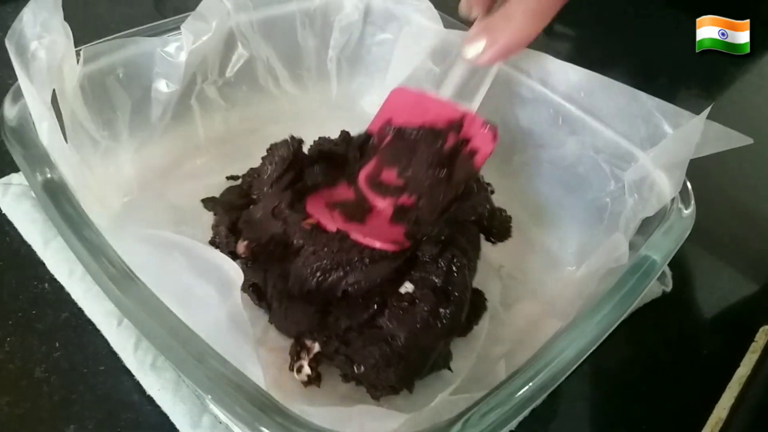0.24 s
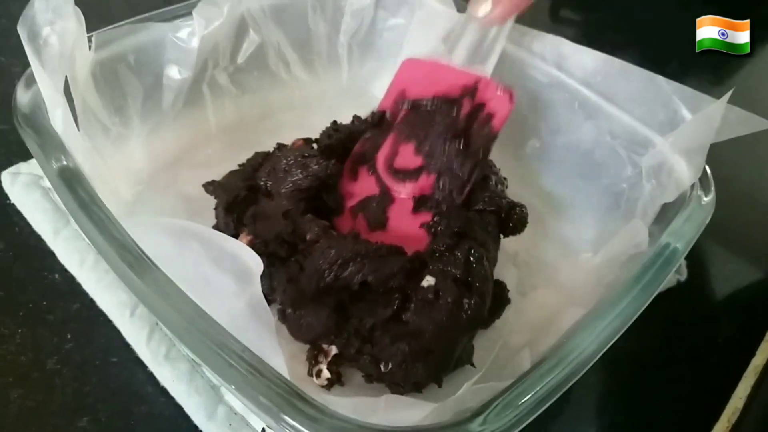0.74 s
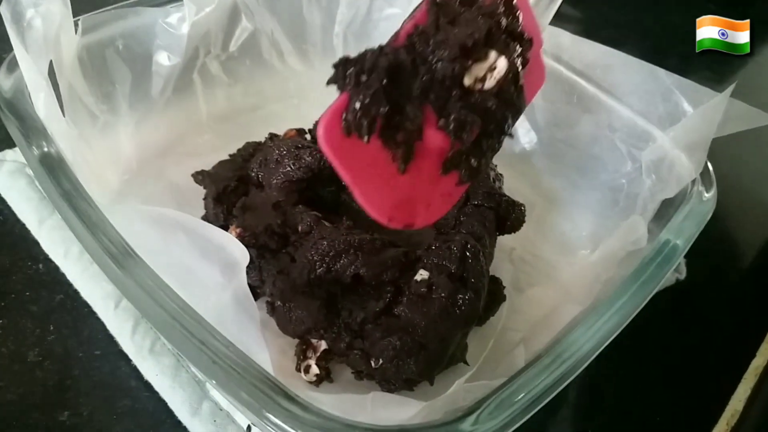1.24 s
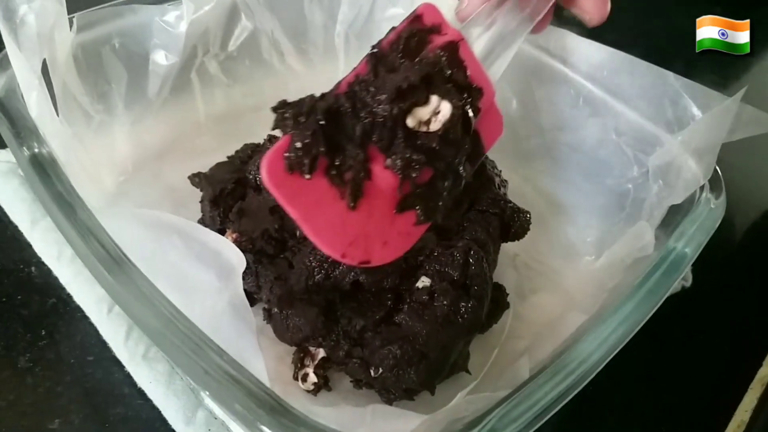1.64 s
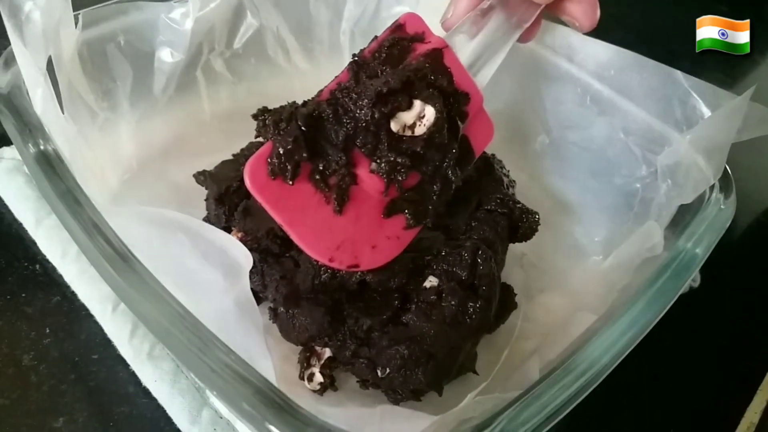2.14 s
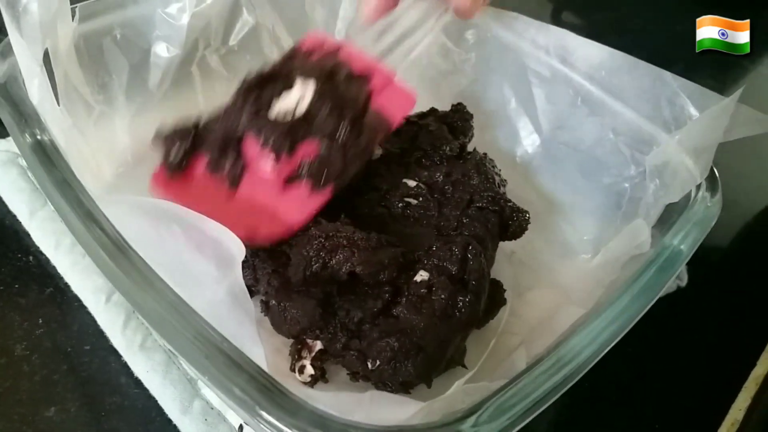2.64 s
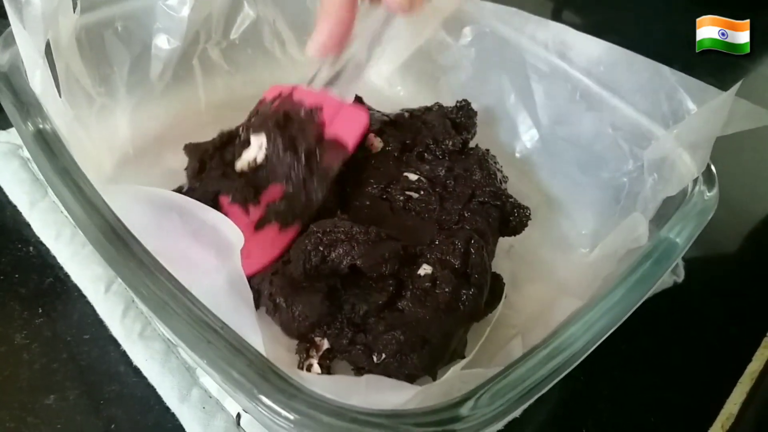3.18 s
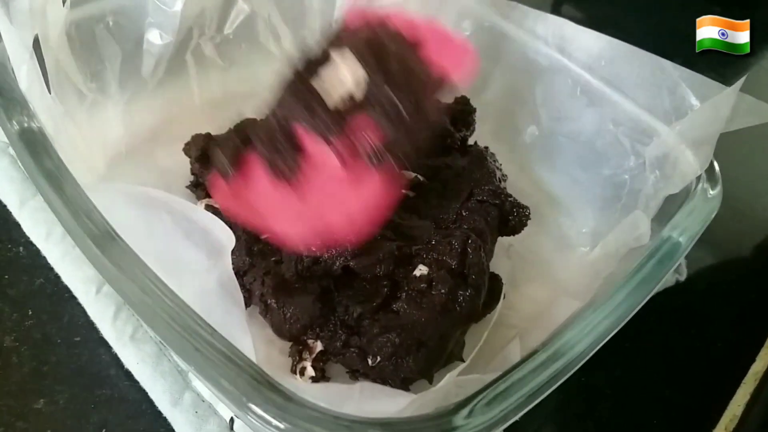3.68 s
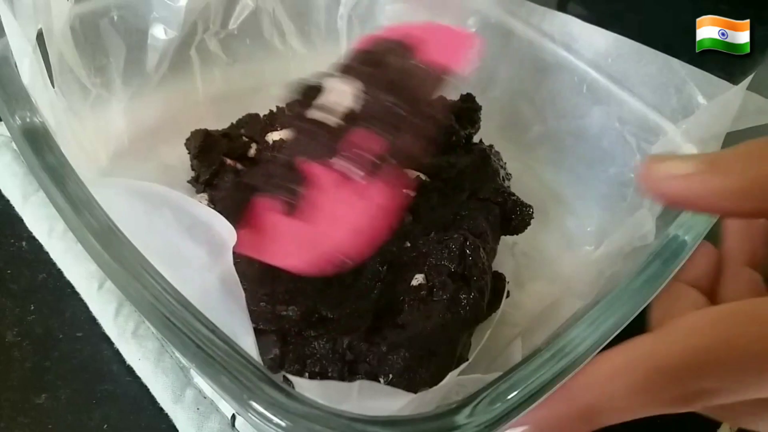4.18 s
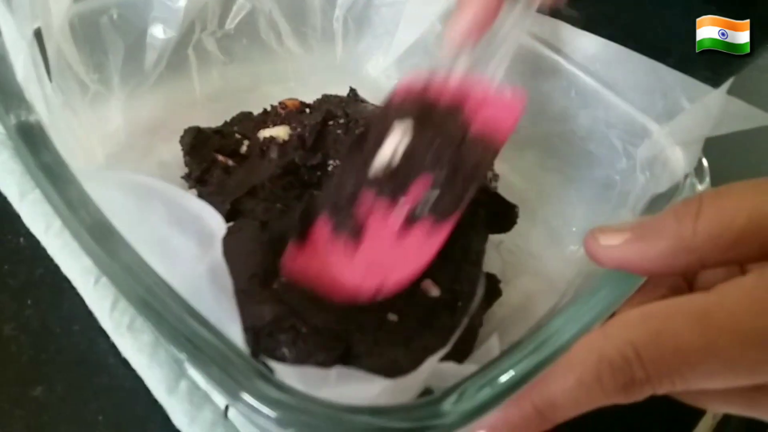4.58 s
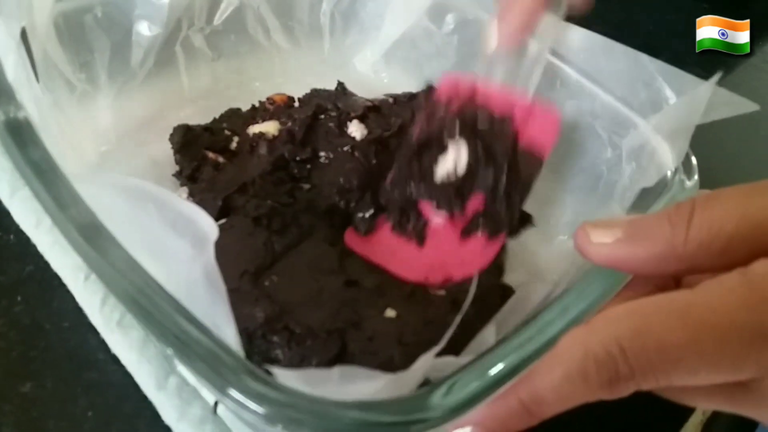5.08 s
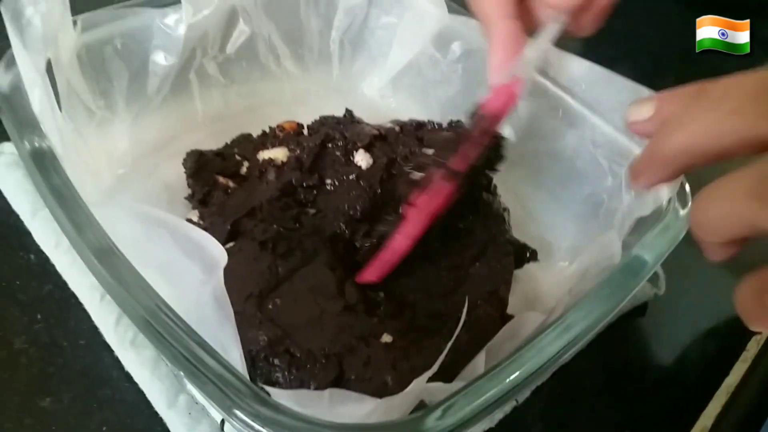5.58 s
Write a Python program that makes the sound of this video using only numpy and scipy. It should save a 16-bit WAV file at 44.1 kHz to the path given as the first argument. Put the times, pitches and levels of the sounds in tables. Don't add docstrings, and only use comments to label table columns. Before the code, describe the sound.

Close to a small camera microphone, a spatula presses thick sticky fudge onto paper in a glass dish: soft squelches, small pops, crisp crackles. Dry camera ticks run early on. A knock further off in a hard-walled kitchen sets panels and steel ringing, then a soft door thud follows. The final part brings the loudest wet smacks over a faint hum.

```python
import sys
import numpy as np
from scipy import signal
from scipy.fft import rfft, irfft
from scipy.io import wavfile
from scipy.ndimage import uniform_filter1d

SR = 44100
rng = np.random.default_rng(int(sys.argv[2]) if len(sys.argv) > 2 else 0)


def store_pcm(level_fs):
    pcm = np.round(np.clip(level_fs, -1, 1) * 32767).astype(np.int16)
    wavfile.write(sys.argv[1], SR, np.atleast_2d(pcm).T)


def volts_from_db(level):
    exponent = np.asarray(level, float) / 20
    return 10 ** exponent


N = 256662
TIME = np.arange(N) / SR


def unit(x):
    return x / np.sqrt(np.mean(x ** 2))


def band(x, lo_hz, hi_hz):
    return signal.sosfilt(signal.butter(2, [lo_hz, hi_hz], "band", fs=SR, output="sos"), x)


def on_log_hz(table, hz):
    f, v = np.transpose(table)
    return np.interp(np.log(np.maximum(hz, 1)), np.log(f), v)


def colour(x, table):
    spectrum = volts_from_db(on_log_hz(table, np.fft.rfftfreq(4096, 1 / SR)))
    cepstrum = irfft(np.log(spectrum))
    cepstrum[1:2048] *= 2
    cepstrum[2049:] = 0
    h = irfft(np.exp(rfft(cepstrum)))[:2048]
    return signal.fftconvolve(x, h / np.linalg.norm(h))[:len(x)]


def fade(t, t60):
    return np.exp(-np.log(1000) * t / t60)


def onset(t, rise_s):
    return np.minimum(t / rise_s, 1)


def add(track, s, sound):
    i = int(s * SR)
    track[i:i + len(sound)] += sound[:N - i]


def walk(rate):
    k = int(SR / rate)
    return uniform_filter1d(np.repeat(rng.standard_normal(N // k + 1), k), k)[:N]


def swells(rows, rest_db):
    power = volts_from_db(rest_db) ** 2
    for s, db, rise, fall in rows:
        before = (s - TIME) / max(rise, .005)
        after = (TIME - s) / max(fall, .005)
        power = power + volts_from_db(db - 20 * np.maximum(before, after)) ** 2
    return np.sqrt(power)


def blip(t, hz, cycles):
    u = t * hz / cycles
    return (u * np.exp(1 - u)) ** 2 * np.sin(2 * np.pi * hz * t)


def burst(t, hz, cycles, rise=0.24):
    u = t * hz
    shape = (1 - np.exp(-u / rise)) ** 2 * np.exp(-u / (1.8 * cycles))
    return shape / shape.max() * np.sin(2 * np.pi * u)


def crackle(rate, lo_hz, hi_hz, cycles, spread_db):
    out, t = np.zeros(N), TIME[:256]
    for when, pitch, size in rng.random((int(rate * N / SR), 3)):
        hz = lo_hz * (hi_hz / lo_hz) ** pitch
        level = volts_from_db(-spread_db * np.log(size + 0.043))
        add(out, when * N / SR, level * blip(t, hz, cycles))
    return unit(out)


# start in seconds, peak level in dB, cavity pitch in Hz, ring in cycles.
CLEAN_POPS = [(.432, -50, 3400, 1.1), (.435, -50, 3460, 1.4), (.4468, -41, 3550, 5.2),
              (.447, -35, 1080, 0.6), (.447, -46, 2440, 3.9), (.4498, -36.5, 1030, 0.63),
              (.4565, -46, 530, 0.78), (.568, -46, 730, 0.81), (.568, -48, 1710, 1.6),
              (.75, -50.5, 1240, 0.89), (4.182, -42, 2120, 3.9), (4.183, -48.5, 1130, 1.5),
              (4.865, -31.5, 2100, 1.7), (4.866, -31, 650, 0.28), (4.873, -34, 785, 1.4),
              (4.9515, -37, 1900, .5), (4.968, -49, 700, 1.5), (5.019, -44, 3760, 2.2),
              (5.021, -30, 1910, 0.8), (5.0235, -32, 1800, 0.86), (5.0345, -32, 3230, 1.2),
              (5.039, -32, 1270, 1.4), (5.0605, -15, 1250, 1.3), (5.0606, -34.5, 2870, 2.1),
              (5.072, -30, 1440, 3.5), (5.079, -33, 1190, 2), (5.089, -33, 1360, 2.5),
              (5.097, -35, 1130, 2.5), (5.113, -44, 1300, 1.5), (5.13, -36, 1300, 2.1),
              (5.136, -39, 1330, 2.3), (5.148, -33, 1310, 2), (5.17, -49, 810, 0.87),
              (5.21, -40.5, 698, 1.7), (5.216, -41.5, 740, 1.1), (5.273, -38, 2310, 1.2),
              (5.332, -50, 3620, 2), (5.372, -36, 1870, 1.7), (5.375, -34, 2300, 1.1),
              (5.384, -38, 2180, 1.2), (5.395, -57, 3960, 2), (5.397, -45, 1700, 1.5),
              (5.408, -48, 2200, 1.8), (5.442, -31.5, 1510, 1), (5.454, -44, 1380, 2),
              (5.463, -47, 1600, 1.5), (5.472, -38, 3520, 2.2), (5.517, -41, 1860, 1.4),
              (5.527, -41, 1370, 1.6)]
# start in seconds, peak level in dB, cavity pitch in Hz, ring in cycles.
AFTER_POPS = [
    (.464, -51, 700, 1.1),
    (.476, -53, 700, 2),
    (.497, -55, 800, 1.1),
    (4.183, -51.5, 3060, 2.4),
    (4.882, -44, 800, 1),
    (4.897, -48, 900, 1.3),
    (5.177, -51, 1300, 1.7),
    (5.19, -48, 1350, 2),
]
# start in seconds, peak level in dB, cavity pitch in Hz, ring in cycles.
SMACKS = [(.6415, -46.5, 1900, 0.81), (1.212, -52, 2452, 0.22), (1.265, -53.5, 1290, 0.3),
          (1.913, -55.5, 1440, 0.99), (2.86, -45.5, 1294, 2.6), (2.971, -65, 3950, 1.1),
          (3.089, -46, 2400, 0.5), (3.13, -41.5, 1310, 0.49), (3.446, -57, 2430, .6), (4.116, -54, 3120, 1),
          (4.519, -47, 2070, 0.47), (4.576, -55, 2800, 1.1), (4.605, -54.5, 3380, 2),
          (4.625, -52.5, 2200, 0.55), (4.853, -41.5, 1280, 3.9), (4.86, -39, 890, 0.95),
          (4.951, -47, 776, 0.8), (4.962, -37, 700, 0.22), (5.017, -35, 1860, 0.32),
          (5.035, -33.5, 1870, 3.1), (5.046, -33, 1860, 1.1), (5.144, -23.5, 1896, 2.9),
          (5.158, -34, 810, 1), (5.218, -39, 1310, 1.6), (5.272, -39, 830, 0.27), (5.33, -46, 1310, .45),
          (5.365, -50, 1830, 2), (5.382, -37, 1650, 1), (5.432, -45.5, 1300, 1.1),
          (5.72, -50.5, 1430, 0.25)]


def pops():
    out, t = np.zeros(N), TIME[:3000]
    for rows, grit_db in ((CLEAN_POPS, -13), (AFTER_POPS, -20), (SMACKS, -4.5)):
        noises = rng.standard_normal((len(rows), len(t)))
        for (s, db, hz, cycles), noise in zip(rows, noises):
            grit = unit(band(noise, 1370, 3370)) * onset(t, 0.0013) * fade(t, 0.024)
            cavity = burst(t, hz, np.clip(cycles, .3, 6))
            add(out, s + 0.0005, volts_from_db(db + 0.5) * (cavity + volts_from_db(grit_db) * grit))
    return out


# start in seconds, peak level in dB.
THUMPS = [(.447, -40.5), (.568, -53), (0.751, -60), (1.21, -60), (1.914, -60), (2.862, -46), (3.093, -53.5),
          (3.132, -40.5), (4.114, -52), (4.855, -39.5), (4.875, -58), (4.963, -40), (5.018, -44),
          (5.158, -30.5), (5.211, -41), (5.273, -43.5), (5.331, -48), (5.735, -47.5)]


def dish():
    out, t = np.zeros(N), TIME[:3000]
    for s, db in THUMPS:
        add(out, s, volts_from_db(db) * blip(t, 345, 0.34))
    return out


# time of the peak in seconds, peak level in dB, rise in seconds, fall in
# seconds, squelch of a deep press in dB over that level.
PRESSES = [(.21, -70, 0.069, 0.38, -15), (.45, -56.5, 0.056, 0.079, -1.5), (.63, -68, 0.44, .4, 0.5),
           (.89, -67, 0.092, .09, -4.5), (1.22, -66, 0.058, 0.17, -5), (1.92, -77, .05, 0.081, 13.5),
           (2.85, -58.5, 0.1, 0.093, -0.5), (3.049, -60.5, 0.17, 0.039, 1),
           (3.12, -54.5, 0.059, 0.078, 1.5), (3.27, -68, 0.44, 0.33, -2), (3.5, -71, 0.083, 0.34, 3.5),
           (3.93, -65.5, 0.56, 0.2, -6), (4.13, -64, .1, 0.079, -2), (4.2, -62, 0.039, 0.18, -1),
           (4.51, -66.5, 0.14, 0.13, 1), (4.62, -62, 0.055, 0.12, -5.5), (4.858, -47.5, 0.0079, 0.093, 7),
           (4.96, -56, 0.014, 0.05, 9.5), (5.03, -58.5, 0.068, .4, 8.5), (5.151, -44.5, 0.024, 0.03, 8.5),
           (5.22, -52, 0.18, 0.11, 5), (5.33, -57.5, 0.22, 0.034, 2), (5.38, -51, 0.011, 0.043, 2.5),
           (5.5, -61.5, 0.21, 0.14, 1), (5.739, -64, 0.031, 0.086, 3.5)]
# frequency in Hz, density in dB per Hz.
MIXTURE_COLOUR = [(290, -71), (500, -25.5), (735, -13.5), (1070, -13.5), (1690, -7), (1830, -9), (2230, -8),
                  (3120, -10.5), (4260, -7), (6000, -22), (7800, -60), (13200, -120)]


def mixture():
    grains = crackle(1200, 535, 6500, 1.13, 2.4) + 0.5 * rng.standard_normal(N)
    tearing = colour(grains, MIXTURE_COLOUR)
    fizz = swells([row[:-1] for row in PRESSES], rest_db=-75.5)
    squelch = swells([(s, db + deep, rise, fall) for s, db, rise, fall, deep in PRESSES], rest_db=-77)
    return fizz * unit(band(tearing, 1336, 8900)) + squelch * unit(band(tearing, 226, 1700))


# start in seconds, end in seconds, pitch in Hz, width in Hz, level in dB.
SLIDES = [
    (2.797, 2.892, 2315, 920, -64.5),
    (3.815, 4.016, 1520, 900, -71.5),
    (2.988, 3.115, 2420, 500, -65),
    (3.57, 3.74, 4650, 300, -75.5),
    (3.774, 3.974, 2430, 241, -72),
    (3.786, 3.91, 4150, 600, -72),
    (5.047, 5.125, 2750, 250, -53),
    (5.155, 5.203, 3500, 350, -56),
    (5.205, 5.229, 3400, 700, -52.5),
    (5.38, 5.433, 2210, 300, -62),
]


def slides():
    out = np.zeros(N)
    for start, end, hz, width_hz, db in SLIDES:
        stroke = np.clip((TIME - start) / (end - start), 0, 1)
        swell = np.sqrt(np.clip(np.sin(np.pi * stroke), 0, 1))
        edge = band(rng.standard_normal(N), hz - width_hz / 2, hz + width_hz / 2)
        out += volts_from_db(db) * swell * unit(edge)
    return out


# time of the peak in seconds, peak level in dB, rise in seconds, fall in seconds.
TUGS = [(.21, -75.5, .2, 0.36), (.45, -68, 0.13, 0.31), (.63, -67.5, .3, 0.1), (.7, -70.5, .2, 0.045),
        (.89, -63, 0.042, 0.056), (1.22, -76.5, 0.11, 0.33), (2.82, -65, 0.033, 0.12),
        (2.87, -64, 0.073, 0.048), (3.049, -67, 0.13, 0.031), (3.122, -57, 0.044, 0.048),
        (3.27, -69.5, 0.13, 0.23), (3.5, -72.5, 0.16, 0.16), (3.93, -68.5, 0.38, 0.32),
        (4.13, -63.5, 0.071, 0.15), (4.51, -70.5, 0.18, .1), (4.62, -60, 0.055, 0.086),
        (4.862, -58.5, .025, .1), (4.96, -66, 0.033, .3), (5.03, -57, 0.052, 0.29),
        (5.15, -57.5, 0.081, 0.088), (5.22, -61.5, .1, 0.064), (5.33, -63.5, 0.039, 0.042),
        (5.41, -62.5, 0.061, 0.12), (5.49, -64.5, 0.17, 0.076), (5.73, -68, 0.016, 0.14)]
# frequency in Hz, density in dB per Hz.
PAPER_COLOUR = [(2650, -61), (4500, -5), (7370, -7), (8970, 2), (11700, 2), (13200, -1), (14300, 6),
                (15000, -35)]


def paper():
    creasing = colour(crackle(2500, 4600, 14300, 5.0, 1.7) + 0.44 * rng.standard_normal(N), PAPER_COLOUR)
    return swells(TUGS, rest_db=-88) * unit(creasing)


# start in seconds, peak level in dB, centre in Hz.
SNAPS = [(.2184, -47.5, 13000), (.4458, -30, 13900), (.5498, -43, 12000), (.619, -50, 9700),
         (.6424, -41.5, 10000), (.895, -51, 10200), (1.2125, -46.5, 5570), (2.2343, -39, 8400),
         (2.2345, -45, 6200), (3.096, -45, 9100), (3.455, -48.5, 11000), (3.4885, -48, 13500),
         (4.0018, -57, 13800), (4.0305, -49.5, 10200), (4.0826, -43, 13600), (4.1285, -39, 12900),
         (4.581, -38.5, 10900), (4.6242, -40, 13100), (4.855, -40.5, 10500), (4.8663, -36.5, 8850),
         (4.9512, -36.5, 12100), (4.964, -42, 10000), (5.021, -41, 10600), (5.034, -34, 10050),
         (5.0613, -33, 8300), (5.1445, -27.5, 9800), (5.2078, -41.5, 10400), (5.3238, -46, 13100),
         (5.378, -46, 8900), (5.477, -43, 10700), (5.7203, -44, 12700)]
SETTLES = [0.027, 0.16, .187, 0.3255, .522, .855, 3.051, 3.2574, 3.306, 3.4173, 3.916, 4.774]


def snaps():
    out, t = np.zeros(N), TIME[:800]
    creases = SNAPS + [(s, -52.5, 12100) for s in SETTLES]
    noises = rng.standard_normal((len(creases), len(t)))
    for (s, db, hz), noise in zip(creases, noises):
        edge = 0.72 * unit(band(noise, 6800, 21800)) * onset(t, 0.0011) * fade(t, 0.024)
        add(out, s, volts_from_db(db - 5.5) * (blip(t, hz, 5.3) + edge))
    return out


# first step in seconds, list of the peak level of each step in dB.
LENS_RUNS = [
    (0.3706, [-49, -38, -38, -42, -45, -56, -54, -42, -42, -39, -38, -33, -33, -52]),
    (4.3008, [-34.5, -39.5, -40, -39.5, -47, -44, -52]),
    (5.5, [-41, -34, -36, -36.5, -40.5]),
]


def lens():
    out, t = np.zeros(N), TIME[:300]
    frame_s = 1 / 29.9
    click = np.sin(2 * np.pi * 2700 * t) * np.exp(-((t - .0005) / 0.00018) ** 2)
    for first, steps in LENS_RUNS:
        for k, db in enumerate(steps):
            add(out, first + k * frame_s, volts_from_db(db - 7.5) * click)
    return out


# start in seconds, peak level in dB, pitch in Hz, ring in cycles.
KNOCK = [(2.2342, -20.5, 674, 1.05), (2.236, -26, 870, 1.2), (2.2345, -21, 1520, 0.74),
         (2.2455, -24.5, 730, 1), (2.246, -26, 1550, 1.5), (2.2865, -27, 790, 1.5),
         (2.2865, -32, 1700, 1.3), (2.314, -36, 1400, 1.3), (2.325, -27.5, 770, 2), (2.383, -27, 716, 1.3),
         (2.423, -36, 837, 2.5), (2.45, -35.5, 840, 1.8), (2.485, -47, 800, 1.5), (2.286, -52, 3540, 2.2),
         (2.463, -55, 3420, 2.2), (2.462, -60, 5600, 2.5)]
# frequency in Hz, level in dB.
KNOCK_COLOUR = [(70, -49), (120, -32), (240, -13), (400, -11), (600, -9), (780, -3), (1000, -8.5),
                (1400, -10.5), (1900, -15), (2700, -35), (4000, -34), (7000, -49), (12000, -53),
                (13500, -80)]


def knock():
    direct, push, t = np.zeros(N), np.zeros(N), TIME[:2000]
    for s, db, hz, cycles in KNOCK:
        add(direct, s, volts_from_db(db) * blip(t, hz, cycles))
    push[int(KNOCK[0][0] * SR)] = volts_from_db(3)
    return direct, colour(push, KNOCK_COLOUR)


# frequency in Hz, level in dB, t60 in seconds.
CUPBOARD = [(354, -4, 0.77), (413, -7, 0.86), (490, -26, 1.2), (579, -8.5, 1), (580, -4.5, 0.81),
            (630, -10, 0.78), (666, 2, 0.76), (694, 2, 1), (772, 0, 1.0), (773, -3.5, 0.72), (837, 1, .95),
            (912, 1, 0.68), (1033, -8, 0.81), (1330, -21, 0.76)]


def cupboard():
    out, t = np.zeros(N), TIME[:SR]
    for (hz, db, t60), turn in zip(CUPBOARD, rng.random(len(CUPBOARD))):
        mode = np.sin(2 * np.pi * (hz * t + turn)) * fade(t, t60) * onset(t, 0.023)
        add(out, KNOCK[0][0], volts_from_db(db - 40) * mode)
    return out


# frequency in Hz, level in dB, t60 in seconds.
UTENSIL = [(4522, -3, 0.55), (7472, -8, 0.46), (8522, -14, 0.46), (9087, -23, 0.42), (9598, -24, 0.35),
           (10280, -18, 0.44), (11490, -9, 0.29), (11850, -14, 0.33)]


def utensil():
    out, t = np.zeros(N), TIME[:SR]
    for hz, db, t60 in UTENSIL:
        tone = np.sin(2 * np.pi * hz * t)
        twin = .92 * (4522 / hz) ** 1.2 * np.sin(2 * np.pi * (hz + 10.5) * t - 2.47)
        rattle = .28 * unit(band(rng.standard_normal(SR), hz - 40, hz + 40))
        envelope = fade(t, t60 * (5000 / hz) ** 0.08) * onset(t, 0.00055)
        add(out, KNOCK[0][0], volts_from_db(db - 48.0 + 3 * hz / 8000) * (tone + twin + rattle) * envelope)
    return out


# start in seconds, peak
# level in dB, pitch in Hz.
THUD = [
    (3.488, -46.5, 270),
    (3.501, -37, 243.5),
    (3.53, -41, 278),
    (3.549, -43.5, 241),
    (3.584, -49.5, 261),
    (3.62, -54.5, 290),
    (3.684, -64, 253),
    (4.157, -53.5, 354),
]


def door():
    out, t = np.zeros(N), TIME[:6000]
    for s, db, hz in THUD:
        overtone = volts_from_db(-11.5) * blip(t, 2.04 * hz, 0.84)
        add(out, s, volts_from_db(db) * (blip(t, hz, 1.95) + overtone))
    return out


# frequency in Hz, t60 in seconds.
KITCHEN_T60 = [(150, 0.95), (300, 0.71), (500, 0.74), (800, 0.71), (1200, 0.59), (2000, 0.62), (4000, 0.61),
               (10000, 0.46)]


def kitchen(x, lumpy_db=1.0):
    t = TIME[:SR]
    lumps = volts_from_db(lumpy_db * walk(270)[:SR])
    noise = rng.standard_normal(SR) * lumps * onset(t, 0.00037)
    tail = np.zeros(SR)
    for hz in 70 * 2 ** np.arange(0, 8, .5):
        tail += band(noise, hz / 2 ** .25, hz * 2 ** .25) * fade(t, on_log_hz(KITCHEN_T60, hz))
    return signal.fftconvolve(x, tail / np.linalg.norm(tail))[:N]


# frequency in Hz, density in dB per Hz.
AIR_COLOUR = [(12, -11), (20, 3), (33, -24), (49, -3.5), (80, 1.5), (249, -2), (286, -2.5), (540, -8.5),
              (603, -14.5), (674, -12), (1270, -15), (2550, -14), (5850, -30.5), (13400, -22), (15000, -57)]
# time of the peak in seconds, peak level in dB, rise in seconds, fall in
# seconds.
HUM = [
    (.1, -75.5, .6, 0.88),
    (.75, -66.5, 0.93, 0.57),
    (1.75, -69, 0.3, 0.25),
    (2.4, -62, 0.27, 0.35),
    (2.9, -75, 0.69, 0.71),
    (3.56, -54.5, 0.16, 0.18),
    (4.22, -60, 0.4, 0.26),
    (4.99, -61.5, 0.57, 0.17),
    (5.25, -76, .3, .9),
]


def household():
    air = volts_from_db(-69 + 0.23 * walk(4.77)) * colour(rng.standard_normal(N), AIR_COLOUR)
    hum = unit(band(rng.standard_normal(N), 319.0, 404))
    return air + volts_from_db(-1.5) * swells(HUM, rest_db=-81) * hum


def scene():
    wet = band(pops() + dish(), 77, 16000)
    crisp, thud = snaps(), door()
    blow, push = knock()
    near = wet + crisp + lens() + paper() + mixture() + slides()
    far = blow + thud + utensil() + cupboard()
    to_room = volts_from_db(-16) * band(wet, 120, 1000) + volts_from_db(-9.0) * wet + volts_from_db(-12.5) * crisp + push + volts_from_db(-9.0) * thud
    return (near + far + kitchen(to_room, lumpy_db=0.5) + household())[None]


def top_cut(x):
    return signal.sosfilt(signal.butter(12, 15500, fs=SR, output="sos"), x)


def record(dry):
    shelf = signal.ellip(8, .3, 30, 14300, fs=SR, output="sos")
    rumble = signal.butter(2, 45, "high", fs=SR, output="sos")
    mix = signal.sosfilt(np.vstack([shelf, rumble]), dry) - .0004
    return top_cut(mix)


dry = scene()
out = record(dry)
store_pcm(out)
```